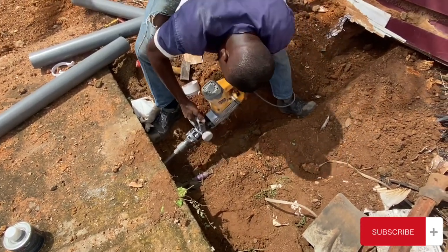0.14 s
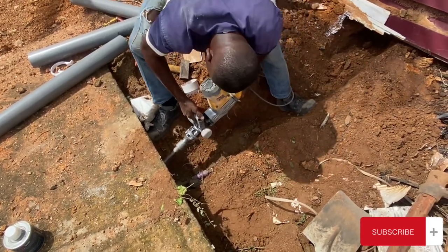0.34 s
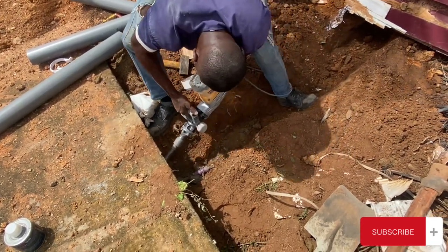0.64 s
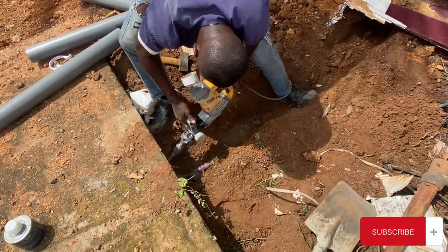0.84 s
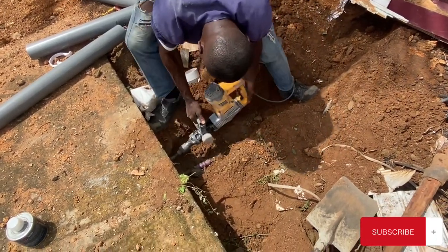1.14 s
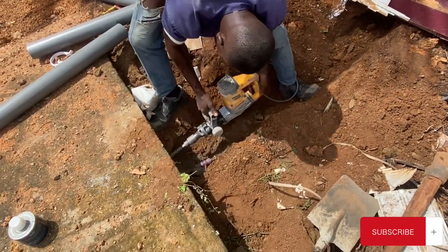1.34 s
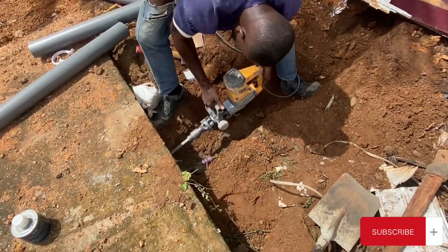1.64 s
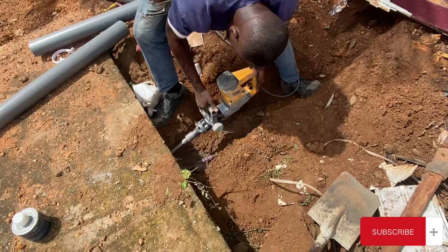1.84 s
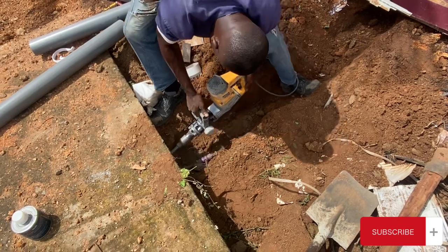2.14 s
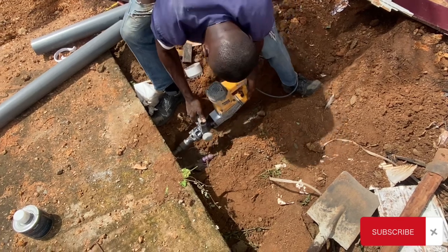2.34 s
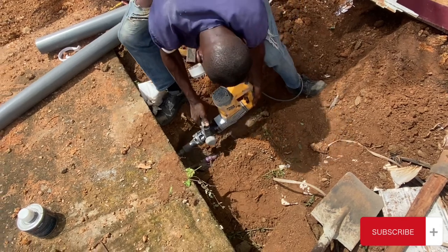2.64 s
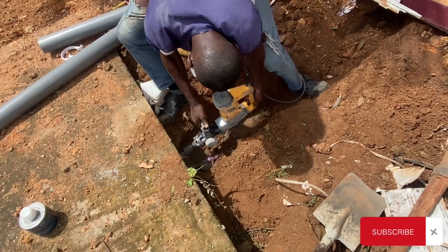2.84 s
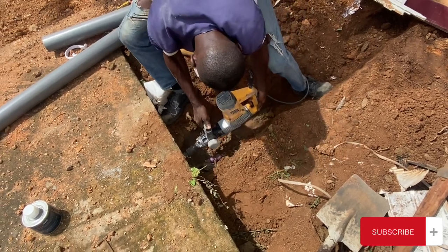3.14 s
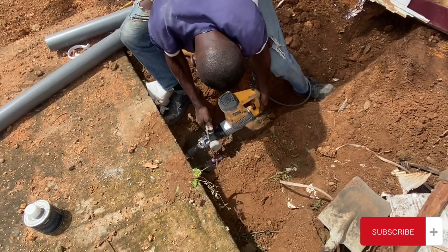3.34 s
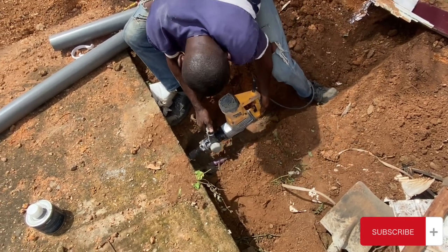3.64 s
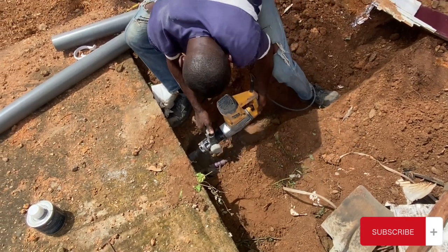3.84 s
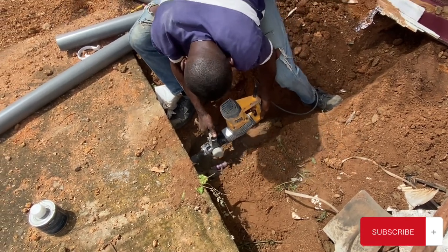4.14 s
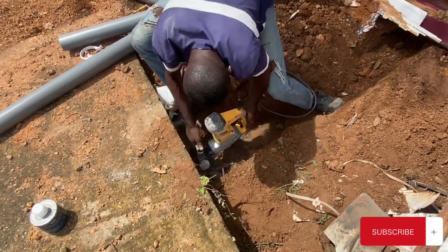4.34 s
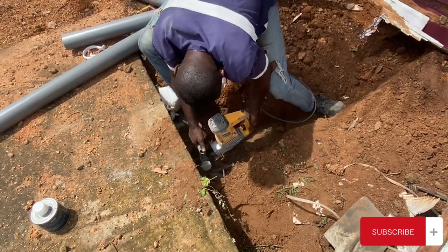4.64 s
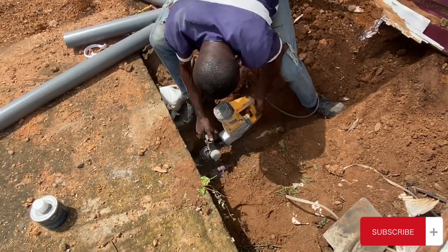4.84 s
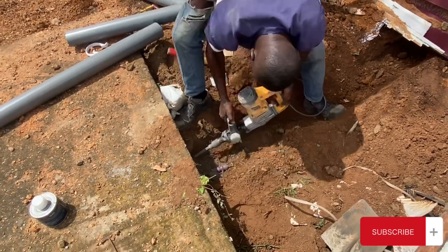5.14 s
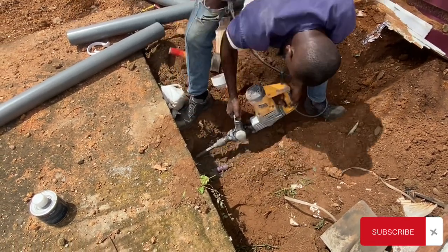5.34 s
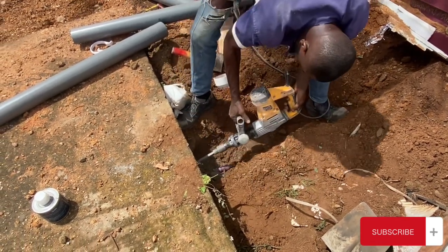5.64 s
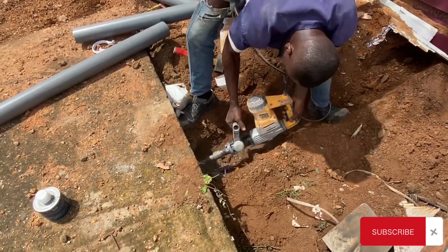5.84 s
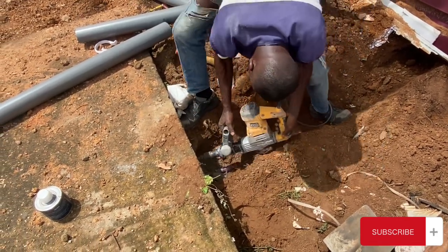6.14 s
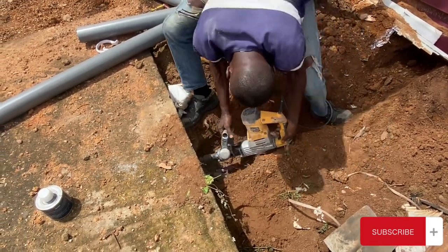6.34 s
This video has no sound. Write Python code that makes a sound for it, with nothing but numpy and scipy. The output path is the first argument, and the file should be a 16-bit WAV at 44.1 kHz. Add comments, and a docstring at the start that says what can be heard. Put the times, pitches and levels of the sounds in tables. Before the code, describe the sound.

An electric demolition hammer hammers hard ground in rapid cracking bursts, ringing steel, with whirring, puffing idle run-downs between, close up outdoors.

```python
"""Outdoors on hard ground, an electric demolition hammer chisels in three bursts, heard by two close microphones.
Each blow is a cracking noise burst with a rebound, a ringing chisel (decaying sines) and a thud of ground modes.
The motor is coloured noise with whine locked to the crank; it runs free or coasts down between bursts,
and the piston puffs and knocks once a turn. Handling ticks, a faint bird, still air and a deep rumble complete it."""
import sys
import numpy as np
from scipy import signal
from scipy.fft import rfft, irfft, next_fast_len
from scipy.io import wavfile
from scipy.ndimage import uniform_filter1d

SR = 44100
rng = np.random.default_rng(int(sys.argv[2]) if len(sys.argv) > 2 else 0)


def generate_wav(signal):
    """Clip the signal to [-1, 1] and save it as 16-bit WAV at the path in sys.argv[1]."""
    frames = np.transpose(np.atleast_2d(signal))
    scaled = np.clip(frames, -1, 1) * 32767
    pcm = np.round(scaled).astype(np.int16)
    wavfile.write(sys.argv[1], SR, pcm)


def how_loud(loudness_db):
    """Turn decibels into a plain amplitude multiplier (0 dB gives 1, 20 dB gives 10)."""
    steps = np.asarray(loudness_db, float) / 20
    return 10 ** steps


N = 285768
SIZE = next_fast_len(N + 8192)   # transform length, with room for tails
HZ = np.maximum(np.arange(SIZE // 2 + 1) * SR / SIZE, 1)


def rms_one(x):
    """Scale to rms 1."""
    return x / np.sqrt(np.mean(x ** 2) + 1e-20)


def evened(x, span_s):
    """Hold the short-term level at 1."""
    return x / np.sqrt(uniform_filter1d(x ** 2, int(span_s * SR)) + 1e-12)


def in_time(rows):
    """Columns of a curve table, one value a sample."""
    s, *columns = np.transpose(rows)
    return [np.interp(np.arange(N) / SR, s, c) for c in columns]


def at_hz(points, hz):
    """Read a spectrum on a log-frequency axis."""
    point_hz, value = np.transpose(points)
    return np.interp(np.log(hz), np.log(point_hz), value)


def filtered(x, response):
    """Multiply by a frequency response."""
    return irfft(rfft(x, SIZE) * response, SIZE)[..., :N]


def highpass(x, order, hz):
    """Take away the bass below a frequency."""
    return signal.sosfilt(signal.butter(order, hz, "high", fs=SR, output="sos"), x)


def noise(spectrum):
    """Noise of a given colour, rms 1."""
    return rms_one(filtered(rng.standard_normal(N), how_loud(at_hz(spectrum, HZ))))


def split(x, hz):
    """The parts below and above a frequency."""
    low = signal.sosfilt(signal.butter(2, hz, fs=SR, output="sos"), x)
    return low, x - low


def wander(hz, count):
    """Smooth random curves of spread 1, moving at rates up to about hz."""
    r = np.exp(-2 * np.pi * hz / SR)
    settle = 9000
    slow = signal.lfilter([1], [1, -2 * r, r * r], rng.standard_normal((count, N + settle)))[:, settle:]
    return slow / slow.std(axis=1, keepdims=True)


def clicks(s, db):
    """A train of single samples."""
    out = np.full(N, 1e-18)   # a tiny floor keeps the filters out of denormal numbers
    np.add.at(out, np.clip(np.round(s * SR).astype(int), 0, N - 1), how_loud(db))
    return out


def fading(x, t60, rise_s):
    """Each click becomes an envelope with a short rise and an exponential fall."""
    fall, rise = how_loud(-60 / (t60 * SR)), np.exp(-1 / (rise_s * SR))
    return signal.lfilter([1 - rise], np.convolve([1, -fall], [1, -rise]), x)


def ring(x, hz, t60):
    """A two-pole resonance: a unit click sets a sine of height 1 ringing."""
    r, w = how_loud(-60 / (t60 * SR)), 2 * np.pi * hz / SR
    return signal.lfilter([0, np.sin(w)], [1, -2 * r * np.cos(w), r * r], x)


def struck(modes, s, db, spread_db, blur_s):
    """Every blow strikes each mode with its own strength, at a random moment of a chattering contact."""
    out = np.zeros(N)
    for hz, level_db, t60 in modes:
        late, strong = rng.random((len(s), 2)).T
        strength_db = db + level_db + spread_db * (2 * strong - 1)
        out += ring(clicks(s + blur_s * late, strength_db), hz, t60)
    return out


# Crank speed through run-up, load, free run and coast-down. Each row: time in seconds, strokes per second.
CRANK = [(.45, 8.74), (.6, 28.89), (.75, 34.18), (.95, 36.42), (1.15, 34.56), (1.4, 29.37), (1.88, 18.02),
         (2.0, 29.14), (2.15, 35.27), (2.45, 36.61), (2.95, 36.63), (3.2, 37.4), (3.5, 37.76), (3.7, 36.96),
         (4.2, 37.18), (4.36, 34.42), (4.45, 44.49), (4.85, 52.25), (5.05, 46.07), (5.6, 30.04),
         (6.2, 16.37), (6.3, 11.5), (6.39, 24.2), (6.48, 30.5)]


def crank_speed():
    """The crank's strokes per second, which time the blows and puffs and pitch the whine."""
    return in_time(CRANK)[0]


def strokes(spans):
    """Within each span the crank gives one stroke a turn."""
    t = np.arange(N) / SR
    turns = np.cumsum(crank_speed()) / SR
    return np.concatenate([np.interp(np.arange(*np.interp(span, t, turns)), turns, t) for span in spans])


# Chisel pressed in, a blow every turn. Each row: first blow in seconds, end in seconds.
BURSTS = [(.5311, 1.14), (1.9237, 4.37), (6.2658, 6.47)]
# The usual blow as the chisel works in.
# Each row: time in seconds, settings for crack, chisel ring and ground thud in dB.
BITE = [(.53, -12.5, -54, -39), (.75, -11.5, -31, -34), (.9, -6, -29, -38.5), (1.13, -12, -15, -34.5),
        (1.92, -15, -35, -40.5), (2.1, -9.5, -21, -36), (2.33, -25, -12, -36.5), (2.4, -6.5, -24, -31),
        (2.62, -11, -9.5, -28), (2.68, -12, -29, -32.5), (3.0, -14, -37, -29.5), (3.1, -12.5, -41, -25.5),
        (3.45, -13, -31.5, -27), (4.2, -14, -52, -24), (4.24, -14, -45, -43), (4.36, -14.5, -34, -42.5),
        (6.26, -21.5, -60, -50), (6.39, -12, -28, -43), (6.47, -11, -30, -48)]
# Blows that stand out, harder or ringing free. Each row: time in seconds, crack and chisel ring settings in dB.
STANDOUT = [(.574, -11.5, -18.5), (.644, -11, -24), (.707, -13, -18.5), (.768, -9, -18), (.825, -6, -22),
            (.854, -9, -16), (.909, -12.5, -15), (.937, -5.5, -25), (.992, -5, -21), (1.02, -12, -11),
            (1.076, -5.5, -17), (1.133, -8.5, -14.5), (1.967, -11, -23.5), (2.001, -13.5, -14.5),
            (2.068, -10, -27), (2.097, -7, -15.5), (2.127, -12.5, -14.5), (2.211, -5, -13.5),
            (2.24, -12.5, -12), (2.269, -12, -20), (2.296, -7, -15.5), (2.324, -5.5, -18),
            (2.353, -10.5, -11), (2.379, -8.5, -20), (2.464, -9, -14.5), (2.517, -8, -14.5),
            (2.545, -8, -36), (2.571, -10.5, -15.5), (2.626, -8.5, -26), (2.707, -15, -21),
            (2.762, -17, -21), (2.871, -13, -18), (2.927, -15, -18), (3.008, -12.5, -22),
            (3.196, -12.5, -33), (3.384, -11.5, -34), (3.569, -9.5, -46), (3.704, -16, -23),
            (3.892, -12, -38), (4.329, -9.5, -29), (6.34, -13, -49), (6.39, -10.5, -30), (6.43, -9, -30),
            (6.465, -8.5, -25)]
SPREADS_DB = (1, 6.5, 0.63)   # chance in crack, ring, thud
JITTER_S = .00005


def blow_rows():
    """Time and strengths of every blow: the usual bite with some chance, and the blows that stand out."""
    s = strokes(BURSTS)
    luck = rng.standard_normal((4, len(s)))
    at, *columns = np.transpose(BITE)
    crack_db, ring_db, thud_db = (np.interp(s, at, column) + spread * chance
                                  for column, spread, chance in zip(columns, SPREADS_DB, luck))
    when, hard_db, free_db = np.transpose(STANDOUT)
    nearest = abs(s - when[:, None]).argmin(axis=1)
    crack_db[nearest], ring_db[nearest] = hard_db, free_db
    return s + JITTER_S * luck[3], crack_db, ring_db, thud_db


# Colour of steel cracks, ground crumble and casing ticks. Each row: frequency in Hz, relative density in dB per Hz.
CRACK = [(130, -7.5), (300, -8.5), (700, -9.5), (1100, -16), (1800, -1.5), (2500, 7), (3100, 6),
         (3800, 7.5), (5000, 4.5), (6500, -1.5), (8300, 6.5), (10000, 3.5), (11300, 8), (12200, -5),
         (13000, -5), (13600, -4.5), (15800, -2.5)]


def crack_noise():
    """The broad noise of hard parts knocking together."""
    return noise(CRACK)


# How long the crack lasts. Each row: frequency in Hz, t60 in seconds.
CRACK_T60 = [(500, 0.069), (2000, 0.027), (6000, 0.024), (14000, 0.027)]
CRACK_RISE_S = 0.00096


def crack(s, crack_db, again, again_db):
    """Blow, rebound and chatter set off noise whose bass lasts longest; loose parts rattle it grainy."""
    chance = rng.standard_normal((3, len(s)))
    hits = clicks(s, crack_db + 0.43 * chance[0]) + clicks(again, again_db)
    # the chisel chatters in its holder
    hits += clicks(s + 0.00009 + 0.0013 * abs(chance[1]), crack_db - 16.0 + 0.79 * chance[2])
    grain = how_loud(3.0 * wander(1000, count=1)[0])
    rest, out = crack_noise(), 0
    for top_hz in (700, 1500, 3000, 6000, 12000, 20000):
        band, rest = split(rest, top_hz)
        out = out + band * fading(hits, at_hz(CRACK_T60, top_hz / np.sqrt(2)), CRACK_RISE_S)
    return how_loud(-5.0) * out * grain


# Steel modes of the casing. Each row: frequency in Hz, relative level in dB, t60 in seconds.
CASING = [(142, -27, 0.037), (310.5, -27, 0.073), (1327, -8.5, 0.0073), (1924, -11.5, 0.01),
          (2374, -9.5, 0.028), (3530, -7, 0.01), (6203, -14.5, 0.021)]


def casing(s, crack_db, again, again_db):
    """The steel casing rings briefly after the blow and again after the rebound."""
    first = struck(CASING, s + .0006, crack_db - 1.5, spread_db=1.0, blur_s=.0025)
    return first + struck(CASING, again, again_db, spread_db=1.5, blur_s=0.00184)


# Steel modes of the chisel. Each row: frequency in Hz, relative level in dB, t60 in seconds.
CHISEL = [(9540, -7, .04), (10400, -14, .035), (11060, 0, .17), (14150, -14, .04)]
SEAT_S = 0.0016   # the chisel settles back on its seat just before each contact, which chokes the ring


def chisel(s, db):
    """Each contact stops the chisel's ringing and starts it anew, a little detuned."""
    t = np.arange(N) / SR
    last = np.maximum(np.searchsorted(s, t) - 1, 0)
    since, out = np.maximum(t - s[last], 0), 0
    for hz, level_db, t60 in CHISEL:
        phase, strong, detune = rng.random((len(s), 3)).T
        start_db = db + level_db + 6.0 * (strong - .5)
        height = how_loud(start_db[last] - 60 * since / t60)
        mode_hz = hz * (1 + 0.005 * (detune[last] - .5))
        out = out + height * np.sin(2 * np.pi * (mode_hz * since + phase[last]))
    until_next = np.r_[s, t[-1] + 1][last + 1] - t
    out = out * np.clip(until_next / SEAT_S, .25, 1)
    return out * (t > s[0]) * how_loud(2.5 * wander(200, count=1)[0])   # the shaking holder roughens the ring


# Modes of ground and slab, and one casing mode near 1480 Hz that sounds with the thud. Each row: frequency in
# Hz, relative level in dB, t60 in seconds.
GROUND = [(97.3, -5.5, 0.058), (182.7, -18.5, 0.47), (231, -14, 0.16), (283, -23, 0.27), (350, -18, 0.34),
          (398.5, -19, 0.59), (464, -1, 0.043), (509, -18, 0.055), (574, -17, 0.047), (634, -17, 0.076),
          (663.4, -4.5, 0.054), (713.2, -8, 0.14), (741, -27, 0.15), (942, -10, 0.076), (1477, -14, 0.055)]
# The ground's colour shifts as the chisel sinks in.
# Each row: time in seconds, boost of the four lowest modes in dB, boost of the next two modes in dB.
DEPTH = [(.53, 6.5, 9.5), (1.14, 11.5, -7), (1.92, 3, 2.5), (2.55, -2.5, 4.5), (3.0, -2.5, 8),
         (3.25, 1.5, 9.5), (3.35, 5, 13), (3.52, -4, 6), (3.6, 6, 11), (3.8, 2, 8.5), (4.2, 0.5, 1),
         (6.3, -11, 6)]


def ground(s, thud_db):
    """The ground answers nearly alike to each blow, so a steady beat gives a row of harmonics."""
    at, *columns = np.transpose(DEPTH)
    deep_db, middle_db = (np.interp(s, at, c) for c in columns)
    thud = np.zeros(N)
    for modes, boost_db in ((GROUND[:4], deep_db), (GROUND[4:6], middle_db), (GROUND[6:], 0)):
        thud += struck(modes, s + .0012, thud_db + 3 + boost_db, spread_db=1, blur_s=.0001)
    thud = highpass(thud, 2, 165)   # a small patch of ground radiates little bass
    crumble = split(crack_noise(), 800)[0] * fading(clicks(s, thud_db - 20), .1, .002)
    return thud + crumble


REBOUND_S, REBOUND_SPREAD_S = .0073, .001
REBOUND_DB, REBOUND_SPREAD_DB = -6, 1.0   # re blow


def blows():
    """The striker hits and rebounds: crack, casing, ringing chisel and ground answer together."""
    s, crack_db, ring_db, thud_db = blow_rows()
    late, strong = rng.standard_normal((2, len(s)))
    again = s + REBOUND_S + REBOUND_SPREAD_S * late
    again_db = crack_db + REBOUND_DB + REBOUND_SPREAD_DB * strong
    contacts = np.c_[s + .0004, again].ravel()
    contacts_db = np.c_[ring_db - 1.5, ring_db + 1.5].ravel()
    steel = crack(s, crack_db, again, again_db) + casing(s, crack_db, again, again_db)
    out = steel + chisel(contacts, contacts_db) + ground(s, thud_db)
    return highpass(out, 4, 95)   # little deep bass remains below about 95 Hz


# Colour of the whirr as heard, with a gap near 12 kHz, without the resonances below.
# Each row: frequency in Hz, relative density in dB per Hz.
WHIRR = [(60, -32.5), (150, -28), (300, -13), (550, -16.5), (1000, -10), (1900, -16.5), (2600, -3),
         (3300, -4), (4200, -1.5), (6000, -10.5), (8200, -12), (10200, -10), (11400, -13.5), (12100, -36),
         (12900, -23), (13600, -17), (15700, -33)]
# Resonances of the motor housing. Each row: frequency in Hz, width in Hz, level re direct sound in dB.
HOUSING = [(1490, 90, 3), (1900, 200, 11), (2550, 180, 3)]


def housed_whirr():
    """Whirring noise with the housing's resonances added to the direct sound, rms 1."""
    direct = noise(WHIRR)
    out = direct.copy()
    for hz, width_hz, level_db in HOUSING:
        r = np.exp(-np.pi * width_hz / SR)
        poles = [1, -2 * r * np.cos(2 * np.pi * hz / SR), r * r]
        out += how_loud(level_db) * signal.lfilter([(1 - r * r) / 2, 0, (r * r - 1) / 2], poles, direct)
    return rms_one(out)


# Tones locked to the crank: rotor hum, then gear and fan whine.
# Each row: multiple of the stroke rate, relative level in dB at 40 strokes per second, waver rate in Hz.
TONES = [(5.85, -29, 5), (40, -20, 35), (86.5, -20, 15), (124, -18, 12), (139, -20, 10)]
# Strength of the tones. Each row: time in seconds, gain in dB.
WHINE = [(.44, 8), (.51, 8), (.58, 0), (1.15, -4), (1.85, -5), (2.1, 0), (4.36, 0), (4.9, 1), (5.3, -1),
         (6.0, 1)]


def whine():
    """Each tone follows the crank speed and wavers in height and phase; slower is fainter."""
    speed = uniform_filter1d(crank_speed(), size=3000)
    turns, out = np.cumsum(speed) / SR, 0
    for multiple, level_db, waver_hz in TONES:
        a, b = wander(waver_hz, count=2)
        angle = 2 * np.pi * multiple * turns
        wavering = (1 + a) * np.sin(angle) + b * np.cos(angle)
        out = out + how_loud(level_db) * (speed / 40) ** 1.2 * wavering
    muffled = signal.sosfilt(signal.butter(6, 4800, fs=SR, output="sos"), out)   # the housing muffles the top
    return muffled * how_loud(in_time(WHINE)[0])


# Faint noise after the handling ticks until 0.435 s, then motor, gears and fan.
# Each row: time in seconds, level in dB, treble gain in dB, bass gain in dB.
MOTOR = [(0, -87, 9, 8), (.13, -63, -2, 12), (.28, -83, -9, 9), (.435, -76, -6, -18),
         (.455, -42.5, -8.5, -38), (.52, -35, -7, 7), (.7, -26, -4, 10), (1.14, -26, -3, 6.5),
         (1.2, -30, -3, 14), (1.35, -32.5, -6, 0), (1.62, -38, -4, -2), (1.85, -37.5, -5.5, 0),
         (1.95, -28.5, -5.5, 7.5), (2.15, -25, -2.5, 9), (2.85, -27, -5.5, 17), (3.55, -26.5, -6.5, 17.5),
         (4.1, -28, -6.5, 13.5), (4.36, -23.5, -4.5, 9.5), (4.42, -31.5, -4.5, 13), (4.9, -28, -4.5, -4),
         (5.0, -26, -5, -3), (5.4, -30.5, -6.5, 3), (6.13, -38.5, -6.5, 0), (6.2, -35, -8.5, 8),
         (6.32, -35, -8, 3), (6.48, -27.5, -3, 10)]


def motor():
    """Whirr in three bands with the whine on top, all riding one level; before start-up only a faint noise."""
    level_db, treble_db, bass_db = in_time(MOTOR)
    bass, rest = split(housed_whirr(), 425)
    middle, treble = split(rest, 2880)
    return how_loud(level_db) * (bass * how_loud(bass_db) + middle + treble * how_loud(treble_db) + whine())


# Chisel lifted, a puff every turn. Each row: first puff in seconds, end in seconds.
IDLING = [(1.1829, 1.88), (4.4062, 6.22)]
# Strength of the piston puffs. Each row: time in seconds, setting in dB.
PUFFS = [(1.18, -28), (1.55, -30), (1.82, -32.5), (1.87, -30), (4.4, -29.5), (4.8, -30.5), (4.95, -27),
         (5.1, -27.5), (5.4, -26), (5.85, -29.5), (6.2, -34.5)]
# The loose striker knocks in the barrel on every idle stroke.
# Each row: frequency in Hz, relative level in dB, t60 in seconds.
BARREL = [(1490, -19, 0.05), (1810, -10, 0.07), (1924, -12, 0.05), (2360, -15, 0.06), (2600, -17, 0.045),
          (2970, -18, 0.04)]
# The piston's push thumps in the casing on every idle stroke.
# Each row: frequency in Hz, level re puff setting in dB, t60 in seconds.
THUMP = [(245, -25.5, 0.054), (360, -25.5, 0.048)]
PUFF_S, PUFF_SPREAD_DB = 0.012, 0.8   # half-length of the swell; chance in strength
SLIDE_TURNS, SLIDE_DB = .24, -6   # reach of the sliding either side of the puff; level re puff setting


def idle_strokes():
    """Each free stroke puffs air as a noise swell, while the loose striker slides, knocks and thumps."""
    s = strokes(IDLING)
    puff_db = np.interp(s, *np.transpose(PUFFS)) + PUFF_SPREAD_DB * rng.standard_normal(len(s))
    swell = signal.fftconvolve(clicks(s, puff_db - 2.0), np.hanning(int(2 * PUFF_S * SR)) ** 2, "same")
    middle, treble = split(split(housed_whirr(), 1470)[1], 3100)
    puff = swell * (how_loud(-7) * evened(middle, span_s=.012) + how_loud(-5.5) * treble)
    rub = rng.standard_normal(N)
    slide = evened(sum(how_loud(level_db) * ring(rub, hz, t60) for hz, level_db, t60 in BARREL), span_s=.02)
    t = np.arange(N) / SR
    near = np.searchsorted((s[1:] + s[:-1]) / 2, t)   # the nearest stroke
    turns_off = (t - s[near]) * np.interp(s, t, crank_speed())[near]
    # a soft, sliding contact
    knock = slide * how_loud(puff_db[near] + SLIDE_DB) * np.exp(-(turns_off / SLIDE_TURNS) ** 2)
    knock += struck(THUMP, s, puff_db, spread_db=7, blur_s=0)
    # an even tick just before the puff peaks
    knock += struck(BARREL, s - .003, puff_db - 15, spread_db=1.5, blur_s=.003)
    return highpass(knock + puff, 4, 170)


# Handling, trigger and start-up knocks. Each row: time in seconds, strength in dB, hollow ring re strength in dB.
TICKS = [(0.039, -42.5, 4), (0.105, -37, -2), (0.12, -45, 9), (0.427, -50, -3), (0.461, -44, 14),
         (1.858, -22, 1), (6.141, -39, 0), (6.168, -54, 7), (6.234, -24, -5), (6.283, -24.5, -6)]
# Hollow ring of handle and trigger housing. Each row: frequency in Hz, relative level in dB, t60 in seconds.
HANDLE = [(400, -20, 0.04), (740, -15, 0.04), (1356, -14, 0.043), (1730, -19, 0.03)]


def ticks():
    """Small dry noise knocks on the casing as it is handled and started, with a hollow ring."""
    s, strength_db, hollow_db = np.transpose(TICKS)
    dull, bright = split(crack_noise(), 4100)
    hollow = struck(HANDLE, s + .003, strength_db + hollow_db, spread_db=2.5, blur_s=.006)
    return hollow + (dull + how_loud(-10.0) * bright) * fading(clicks(s, strength_db), 0.035, 0.00076)


# Deep low rumble, swelling as the motor runs free. Each row: time in seconds, level in dB.
RUMBLE = [(0, -92), (.6, -77), (4.3, -72), (4.9, -71), (5.35, -88), (5.6, -98)]


def rumble():
    """Deep noise between 25 and 55 Hz, independent on the two sides."""
    band = signal.butter(2, [25, 55], "band", fs=SR, output="sos")
    return how_loud(in_time(RUMBLE)[0]) * rms_one(signal.sosfilt(band, rng.standard_normal((2, N))))


# A far bird. Each row: start in seconds, length in seconds, start pitch in Hz, end pitch in Hz, level in dB.
CHIRPS = [(.175, .075, 2650, 2200, -72), (.262, .06, 2620, 2230, -72), (.32, .03, 2550, 2650, -74)]


def bird():
    """Short faint gliding whistles."""
    t, out = np.arange(N) / SR, 0
    for s, length_s, from_hz, to_hz, level_db in CHIRPS:
        part = np.clip((t - s) / length_s, 0, 1)
        glide_hz = to_hz + (from_hz - to_hz) * (1 - part) ** 2
        out = out + how_loud(level_db) * np.sin(np.pi * part) * np.sin(2 * np.pi * np.cumsum(glide_hz) / SR)
    return out


# Colour of the still air. Each row: frequency in Hz, relative density in dB per Hz.
AIR = [(35, -50), (60, -21), (101, -11), (161, -24), (2560, -51), (4000, -48), (9000, -60), (11700, -88),
       (19800, -120)]


def still_air():
    """A faint, steady, low-heavy noise."""
    return how_loud(-69.5) * noise(AIR)


# Each row: frequency in Hz, phase by which the left leads in radians.
LEFT_LEAD = [(0, 0), (950, 1.7), (1890, -1.0), (2330, 3.1), (3190, 3.0), (4310, 3.9), (6630, 5.9),
             (8350, 2.9), (11600, -2.7), (13400, -6.2), (16100, -9.5)]
# Each row: frequency in Hz, left level minus right level in dB.
LEFT_MINUS_RIGHT = [(200, -.5), (380, -3.5), (1290, 0), (2380, -4), (4400, 0)]
# Sound scattered by the ground and the worker. Each row: frequency in Hz, level re direct sound in dB.
SCATTER = [(150, -18), (400, -14), (800, -13), (1400, -2), (1900, -7), (2400, -4), (3100, -4), (4500, 3),
           (11000, -12), (14000, -4)]
SCATTER_T60_S = .03


def two_microphones(x):
    """Direct sound with phase and level difference, plus short scatter that changes as tool and worker shake."""
    side = np.array([[.5], [-.5]])
    lead = np.interp(HZ, *np.transpose(LEFT_LEAD))
    share = how_loud(at_hz(SCATTER, HZ))
    out = rfft(x, SIZE) * np.exp(1j * side * lead)
    t = np.arange(2000) / SR
    weights = wander(9, count=8)
    for weight in weights / np.linalg.norm(weights, axis=0):   # the scattered power stays even
        paths = rng.standard_normal((2, len(t))) * how_loud(-60 * t / SCATTER_T60_S)
        out += share * rfft(rms_one(paths) / np.sqrt(len(t)), SIZE) * rfft(x * weight, SIZE)
    balance = how_loud(side * at_hz(LEFT_MINUS_RIGHT, HZ))
    return irfft(out * balance / np.sqrt(1 + share ** 2), SIZE)[:, :N]


def scene():
    """The tool, bird and still air through both microphones, with the deep rumble underneath."""
    tool = blows() + motor() + idle_strokes() + ticks()
    return two_microphones(tool + bird() + still_air()) + rumble()


def low_pass(x):
    """Removes everything above the highest recorded frequency."""
    return signal.sosfilt(signal.butter(12, 16500, fs=SR, output="sos"), x)


def record(dry):
    """Cut the top above 16.4 kHz and round the peaks."""
    cut = signal.sosfilt(signal.cheby2(10, 60, 16400, fs=SR, output="sos"), dry)
    return low_pass(np.tanh(cut))


dry = scene()
out = record(dry)
generate_wav(out)
```